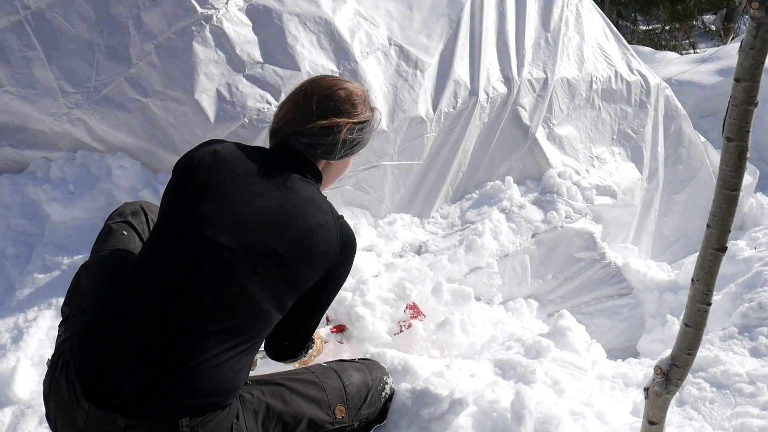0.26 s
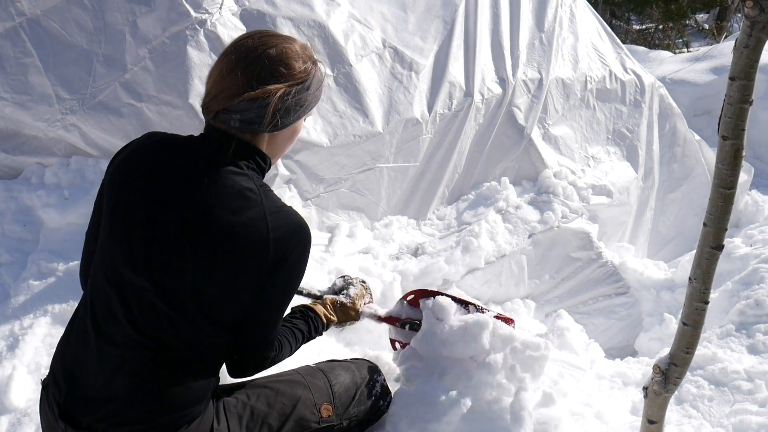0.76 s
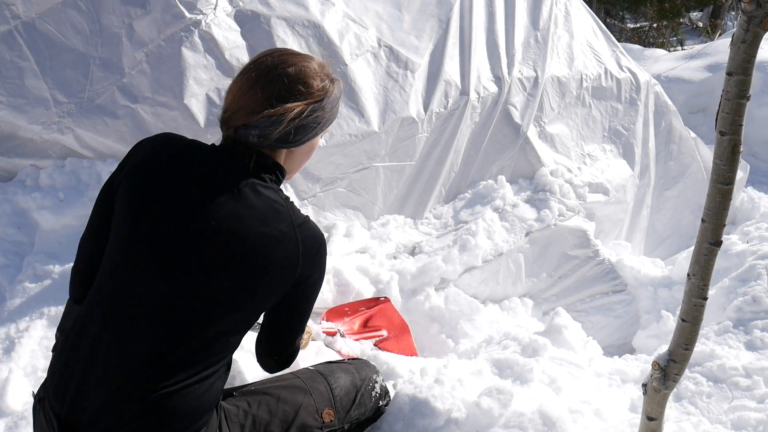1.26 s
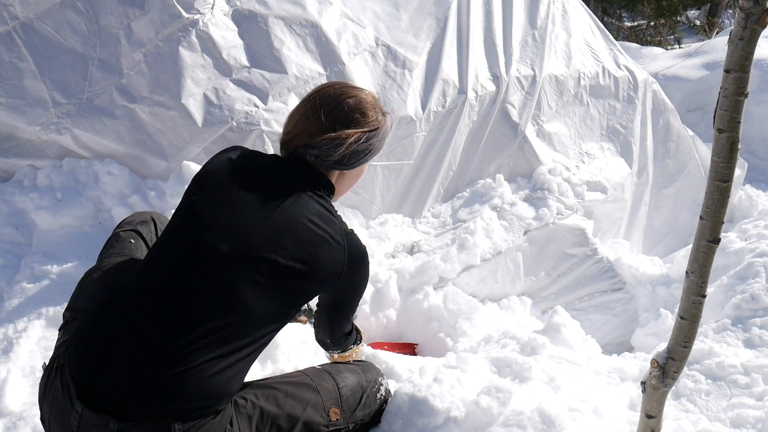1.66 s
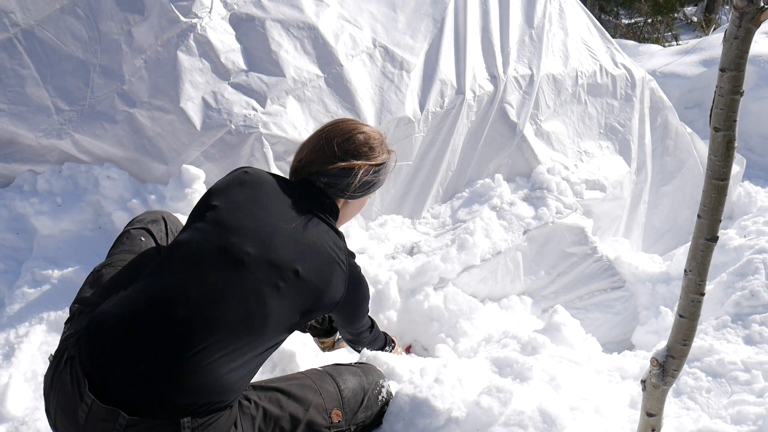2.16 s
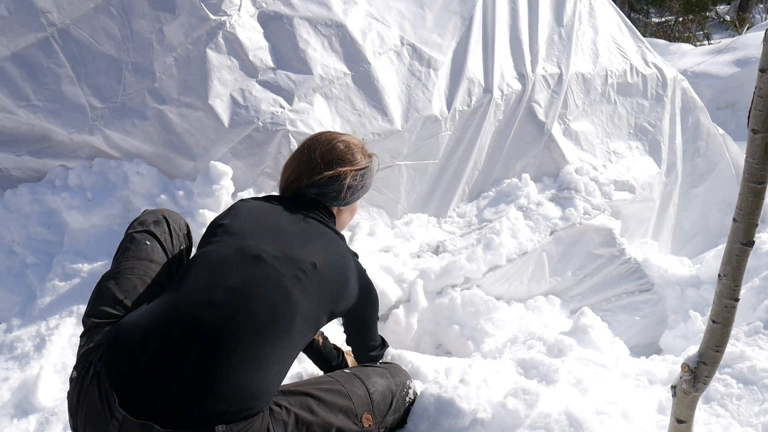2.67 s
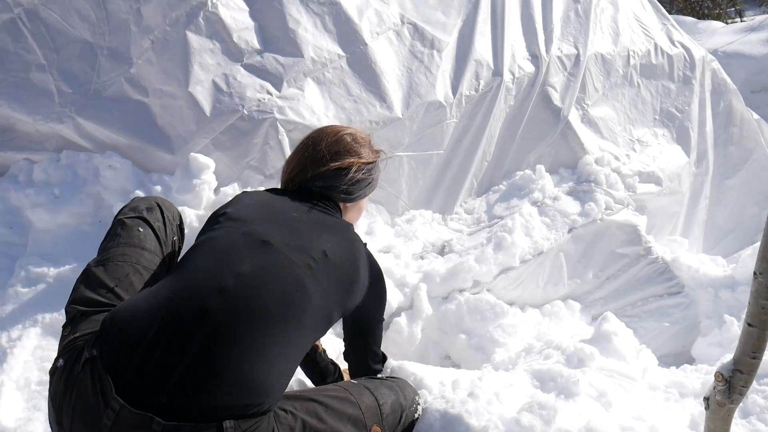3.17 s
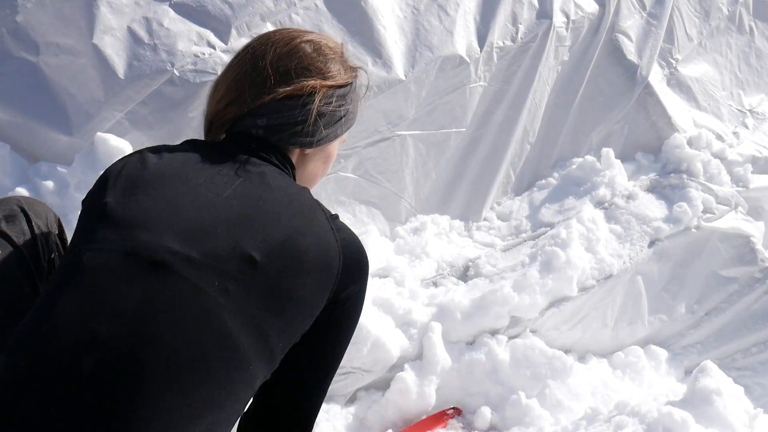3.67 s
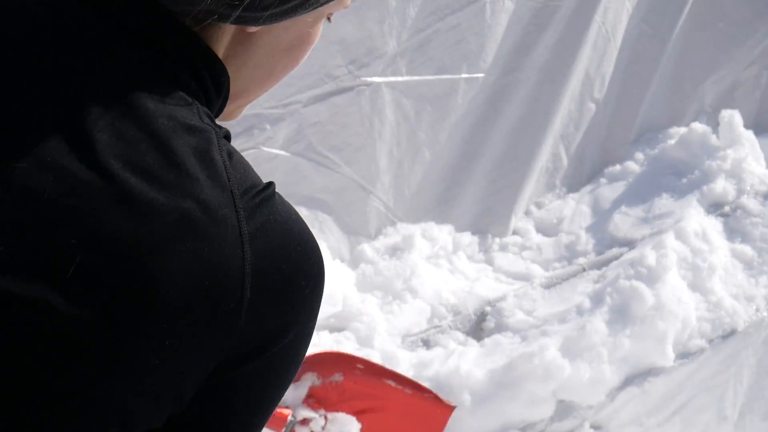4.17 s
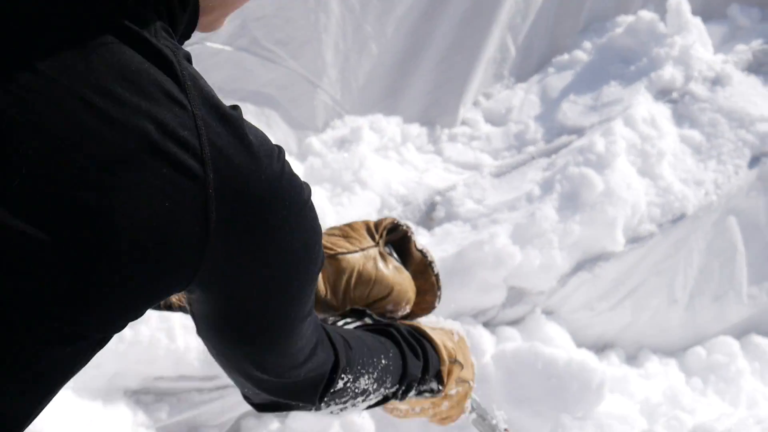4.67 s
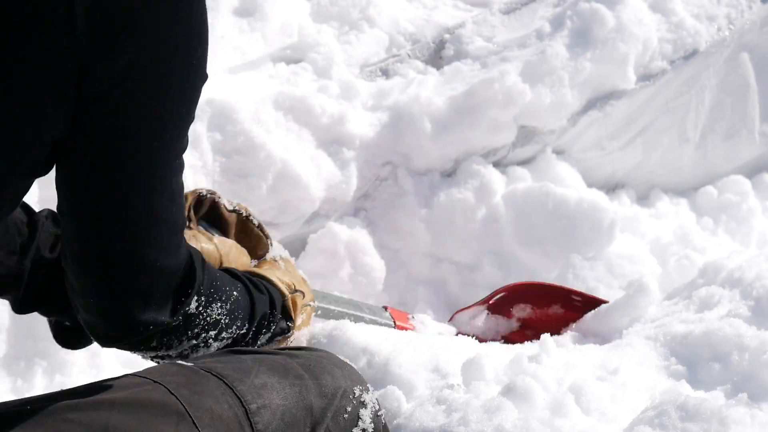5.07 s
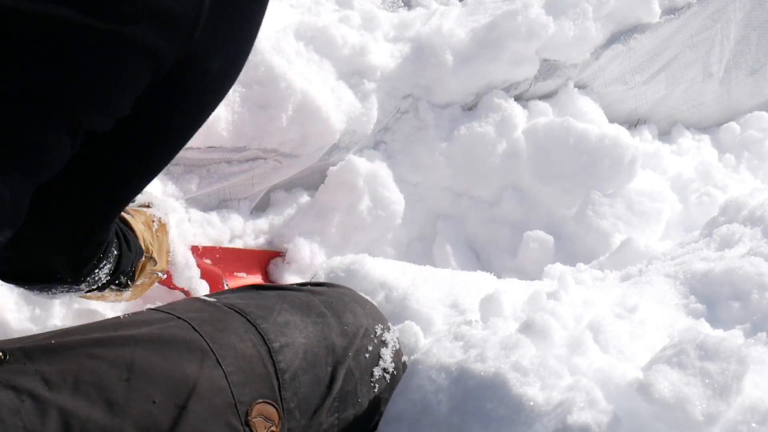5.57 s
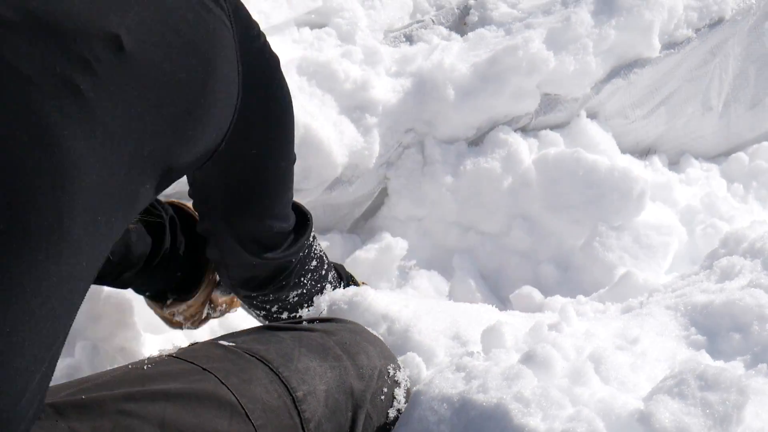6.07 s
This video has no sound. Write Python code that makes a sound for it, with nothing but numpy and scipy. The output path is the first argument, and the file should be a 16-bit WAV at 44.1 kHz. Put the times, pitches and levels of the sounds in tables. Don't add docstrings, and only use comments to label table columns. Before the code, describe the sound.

Close, dry snow digging: gritty crunches, powdery hiss, blade knocks and low thuds in uneven strokes, over faint wind in trees.

```python
import sys
import numpy as np
from scipy import signal
from scipy.fft import rfft, irfft
from scipy.io import wavfile
from scipy.ndimage import uniform_filter1d

SR = 44100
rng = np.random.default_rng(int(sys.argv[2]) if len(sys.argv) > 2 else 0)


def materialize(psi):
    bounded = np.clip(np.atleast_2d(psi).T, -1, 1)
    quanta = np.round(bounded * 32767).astype(np.int16)
    wavfile.write(sys.argv[1], SR, quanta)


def rack_gain(trim_db):
    fader = np.asarray(trim_db, float)
    return 10 ** (fader / 20)


N = 279153
OPPOSED = np.array([[1], [-1]])


def unit(x):
    return x / np.sqrt(np.mean(x ** 2))


def colour(x, points, share=1):
    hz, db = np.transpose(points)
    log_hz = np.log(np.linspace(1, SR / 2, 2049))
    cepstrum = irfft(np.interp(log_hz, np.log(hz), share * db * np.log(10) / 20))
    cepstrum[1:2048] *= 2
    cepstrum[2049:] = 0
    return signal.fftconvolve(x, irfft(np.exp(rfft(cepstrum))))[:N]


def ring(x, hz, width):
    return signal.lfilter(*signal.iirpeak(hz, hz / width, fs=SR), x)


def low_pass(x, hz):
    return signal.sosfilt(signal.butter(2, hz, fs=SR, output="sos"), x)


def walk(rate):
    hold = int(SR / rate)
    steps = np.repeat(rng.standard_normal(N // hold + 1), hold)
    return unit(uniform_filter1d(steps, hold)[:N])


def grains(rate, scatter_db, fine_db):
    sign = (rng.random(N) < rate / SR) * rng.choice([-1, 1], N)
    breaks = sign * rack_gain(np.minimum(scatter_db * rng.exponential(1, N), 15))
    return unit(unit(breaks) + rack_gain(fine_db) * rng.standard_normal(N))


def spread(make, side_db):
    return make() + rack_gain(side_db) * make() * OPPOSED


def pushes(s, rise, hold, fall, first_db, last_db, rest_db):
    t = np.arange(0, N / SR + .001, .001)[:, None] - s
    db = first_db + (last_db - first_db) * np.clip(t / np.maximum(hold, 1e-3), 0, 1)
    db = db - 20 * np.maximum(-t, 0) / rise
    db = db - 20 * np.maximum(t - hold, 0) / fall
    power = np.sum(rack_gain(2 * db), axis=1) + rack_gain(2 * rest_db)
    return np.sqrt(np.interp(np.arange(N) / SR, t[:, 0] + s[0], power))


def swells(table, rest_db):
    s, rise, fall, db = np.transpose(table)
    return pushes(s, rise, 0 * s, fall, db, db, rest_db)


def strokes():
    # peak time in seconds, rise in seconds, fall in seconds,
    # crunch in dB, powder over crunch in dB.
    leans = [(0.0, .05, 0.27, -36, -3.5), (.268, 0.12, 0.195, -46.5, -2.5), (.375, 0.057, 0.268, -47, 5),
             (0.827, 0.0864, 0.344, -38.5, -0.5), (1.02, .03, 0.147, -58, 16.5),
             (1.518, 0.19, 0.054, -42.5, -1.5), (1.751, 0.097, 0.05, -31, -1), (1.92, 0.18, .04, -42, -3.5),
             (2.222, 0.17, 0.12, -35.5, -4.5), (2.363, 0.14, 0.18, -33, -5), (3.0, 0.165, 0.6, -44.5, -5.5),
             (3.136, 0.43, 0.047, -42, -6), (3.328, 0.51, 0.14, -43.5, -5),
             (3.574, 0.12, 0.067, -35.5, -0.5), (3.755, .02, 0.18, -50, 4), (3.954, 0.15, 0.17, -40, -4.5),
             (4.052, 0.12, 0.052, -33.5, -4.5), (4.374, 0.093, 0.022, -43, -2),
             (4.528, 0.17, 0.074, -61, -17), (4.575, .003, .06, -38, 9), (4.64, 0.029, 0.13, -29, 3.5),
             (5.137, 0.11, 0.084, -32, 7), (5.64, 0.13, 0.026, -46, 2.5), (6.222, 0.028, 0.28, -40, -3)]
    # start in seconds, length in seconds, first level in dB,
    # last level in dB, powder over crunch in dB.
    scrapes = [(1.225, 0.019, -63, -53, 10.5), (1.276, 0.012, -58, -49, 5), (1.43, 0.0079, -40, -40, 3.5),
               (1.587, 0.063, -67, -55.5, 3.5), (1.656, 0.1366, -42.5, -33, -1),
               (1.924, 0.096, -39, -47, -2), (2.12, 0.1, -27.5, -35, 2), (2.6, 0.13, -55, -50, -5.5),
               (3.42, 0.063, -46.5, -51, -7), (3.552, 0.1834, -41, -30, -5), (4.085, 0.097, -35, -50.5, -7),
               (4.18, 0.052, -44, -46.5, -10), (4.599, 0.059, -25, -33, 5), (4.756, 0.7, -46, -49.5, -2),
               (5.215, 0.17, -33, -32.5, 3.5), (5.66, 0.1816, -37.5, -34.5, 0.5),
               (5.836, 0.41, -35, -36.5, -3.5)]
    # peak time in seconds, rise in seconds, crunch in dB, powder over crunch in dB.
    jabs = [
        (0.11, 0.051, -40.5, 1),
        (0.536, 0.016, -48, 5),
        (.606, 0.0437, -52.5, 9),
        (0.999, 0.056, -41, 6),
        (2.576, 0.037, -47, -5.5),
        (4.609, 0.022, -15.5, -15),
        (5.491, 0.037, -43.5, 2),
        (5.955, 0.093, -34.5, -4.5),
    ]
    grip_s, let_go_s, jab_fall, rest_db = 0.019, 0.021, 0.95, -65
    rows = [(s, up, 0, down, db, db, powder) for s, up, down, db, powder in leans]
    rows += [(s, grip_s, hold, let_go_s, first, last, powder) for s, hold, first, last, powder in scrapes]
    rows += [(s, up, 0, jab_fall * up, db, db, powder) for s, up, db, powder in jabs]
    *shape, first, last, powder = np.transpose(rows)
    force = pushes(*shape, first, last, rest_db)
    thrown = pushes(*shape, first + powder, last + powder, rest_db + 3.5)
    return force, thrown / force


def patchy(x, depth_db, rate):
    out = 0
    for k, hz in enumerate(700 * 2 ** (np.arange(22) / 6)):
        fade = rack_gain(depth_db * min(3000 / hz, 1) * walk(rate))
        out = out + (-1) ** k * fade * ring(x, hz, hz / 7)
    return out


def crunch(hiss):
    # frequency in Hz, gain in dB.
    crystal_colour = [(500, -37.5), (900, -0.5), (1280, 7.5), (2000, 3), (3500, 2.5), (5000, -10.5),
                      (7000, -13.5), (16000, -68)]
    powder_colour = [(1500, -21.5), (3000, -3), (4500, -0.5), (6500, 3), (8500, 0.5), (10500, 0),
                     (12500, -9), (15500, -15.5)]
    crystals = patchy(grains(1500, scatter_db=1.0, fine_db=0.5), depth_db=2.0, rate=30)
    powder = grains(2500, scatter_db=2.0, fine_db=2.5)
    return unit(colour(crystals, crystal_colour)) + hiss * unit(colour(powder, powder_colour))


def blade():
    # frequency in Hz, bandwidth in Hz, level in dB.
    loaded_modes = [(1050, 122, -4.5), (1348, 67, 0), (1500, 42, 3.5), (1642, 67, 2), (2090, 88, -1.5),
                    (2360, 59, -1), (2540, 110, -1), (2854, 72, -0.5), (3280, 170, -7.5), (3870, 43, -3),
                    (4256, 59, -1.5), (4638, 16, -1), (5010, 290, -10), (5900, 170, -8.5)]
    rub = grains(600, scatter_db=-1.0, fine_db=3.5)
    out = 0
    for k, (hz, width, db) in enumerate(loaded_modes):
        out = out + (-1) ** k * rack_gain(db + 1.7 * walk(20)) * ring(rub, hz, width)
    return unit(out)


def clumps(rate, scatter_db, sharp):
    pitches = 1250 * 2 ** (np.arange(8) / 3.5)
    return unit(sum(ring(grains(rate, scatter_db, fine_db=-30), hz, hz / sharp) for hz in pitches))


def digging():
    force, hiss = strokes()
    slip_db = 0.79 * walk(60) + 1.24 * walk(200)
    crumbs = rack_gain(-8) * hiss ** 0.49 * clumps(25, scatter_db=-3.0, sharp=19.0)
    snow = spread(lambda: crunch(hiss), side_db=-11.5)
    metal = rack_gain(-1) * spread(blade, side_db=-12.5)
    return force * rack_gain(-3.5 + slip_db) * (snow + metal + crumbs)


def bank(x):
    lag_ms, echo_db = 0.7913, -12.5
    late = np.arange(N) - lag_ms * SR / 1000 * (1 + 0.15 * walk(7))
    return x + rack_gain(echo_db) * np.array([np.interp(late, np.arange(N), c) for c in x])


def weight():
    # peak time in seconds, rise in seconds, fall in seconds, level in dB.
    shifts = [(0.0, .1, 0.54, -51.5), (.53, 0.128, 0.18, -56), (1.27, 0.078, 0.044, -56),
              (1.74, 0.28, 0.38, -58.5), (2.4, 0.24, 0.15, -44), (2.96, 0.82, 1.42, -56.5),
              (3.72, 1.2, 0.13, -65), (4.04, 0.31, 0.195, -57), (4.6, .13, 0.88, -69),
              (5.15, .3, 1.3, -64.5), (5.52, 0.11, 0.04, -53), (5.77, 0.135, 0.215, -51.5),
              (5.94, 0.19, 0.86, -47.5)]
    groan = spread(lambda: unit(ring(ring(rng.standard_normal(N), 124.7, 81), 105, 114)), side_db=-7)
    return swells(shifts, rest_db=-68) * groan


def wind():
    # time in seconds, level in dB.
    gusts = [(0.0, -48), (0.69, -45.5), (0.83, -47), (1.09, -46), (1.5, -38.5), (1.8, -35), (2.27, -43),
             (2.47, -42.5), (2.86, -37), (3.06, -40.5), (3.4, -45), (3.75, -41), (4.21, -47.5),
             (4.44, -47.5), (4.74, -44.5), (5.39, -46.5), (5.68, -49), (6.33, -43.5)]
    # frequency in Hz, gain in dB.
    tree_colour = [(40, -36), (300, -10.5), (550, -5.5), (770, 3.5), (900, -4), (1040, -11), (1600, -21),
                   (15000, -49)]
    s, db = np.transpose(gusts)
    gust_db = np.interp(np.arange(N) / SR, s, db)
    sigh = spread(lambda: unit(colour(rng.standard_normal(N), tree_colour)), side_db=-7.5)
    return rack_gain(gust_db - 1.5 + 0.4 * walk(2.02)) * sigh


def thuds():
    # start in seconds, peak in dB, frequency in Hz.
    clods = [(.007, -26, 185), (0.025, -18, 235), (.077, -16.5, 407), (.109, -22, 340.7),
             (.269, -30.5, 173), (.429, -32, 211), (.528, -33, 244), (1.747, -23, 360), (1.916, -23, 333),
             (2.145, -25.5, 269.5), (2.309, -20, 325), (2.388, -26.5, 127), (2.969, -32.5, 265),
             (3.461, -28, 382), (3.7001, -16.5, 357), (3.728, -24, 352), (3.724, -22, 197.6),
             (4.344, -33, 370), (4.596, -27, 384), (5.145, -16, 408), (5.212, -21.5, 348),
             (5.317, -22, 458), (5.481, -29, 106), (5.755, -25, 330), (5.772, -23, 350), (5.911, -25, 268),
             (5.924, -22.5, 332), (6.025, -25, 185.4), (6.139, -22, 269), (6.168, -18, 210),
             (6.283, -24, 327.6)]
    t60_s, push_s = 0.064, 0.0017
    out, t = np.zeros(N + 8192), np.arange(8192) / SR
    for s, db, hz in clods:
        wobble = np.sin(2 * np.pi * hz * t) * rack_gain(-60 * t / t60_s) * (1 - np.exp(-t / push_s))
        out[int(s * SR):][:len(t)] += rack_gain(db - 10.0) * wobble / wobble.max()
    return signal.sosfilt(signal.butter(2, 80, "highpass", fs=SR, output="sos"), out[:N])


def packing():
    # peak time in seconds, rise in seconds, fall in seconds, level in
    # dB.
    squeezes = [(.08, 1.08, 0.23, -38), (.39, 0.13, 0.19, -46), (.53, 0.015, 0.049, -39.5),
                (.9, 0.54, 0.22, -50.5), (1.76, 0.06, 0.064, -31), (1.94, 0.11, 0.1, -39.5),
                (2.15, 0.064, 0.103, -34.5), (2.34, 0.45, 0.27, -36.5), (2.73, 0.486, 0.053, -41.5),
                (3.0, 0.26, 0.17, -38), (3.17, 0.19, 0.05, -37), (3.24, 0.044, 0.92, -43),
                (3.67, 1, 0.055, -44), (3.72, 0.096, 0.034, -34), (3.95, 0.088, 0.62, -41.5),
                (4.6, 0.0353, 0.66, -35), (5.17, 0.45, 0.019, -38.5), (5.34, 0.72, 0.11, -44),
                (5.5, 0.044, 0.019, -40), (5.77, 0.18, 0.23, -36), (5.9, 0.023, 0.97, -40),
                (6.17, 0.36, 0.26, -37.5)]
    # frequency in Hz, gain in dB.
    pack_colour = [(30, -54), (70, -55.5), (130, -7), (200, -0.5), (350, 3), (480, -2), (700, -13.5),
                   (2000, -45.5)]
    steps = spread(lambda: unit(colour(grains(150, scatter_db=5.0, fine_db=0.0), pack_colour)), side_db=-13.0)
    return swells(squeezes, rest_db=-55) * rack_gain(-1.5 + 0.76 * walk(25)) * steps


def snaps():
    # start in seconds, peak in dB, centre in Hz, bandwidth as a ratio to the centre.
    crystal_snaps = [(.106, -19, 2000, 1.2), (.9935, -24, 3500, 1.2), (.998, -22, 2500, 1.2),
                     (1.157, -36, 6000, 1.2), (1.176, -33, 9000, 1), (1.217, -42, 8000, 1.3),
                     (1.435, -20.5, 2500, 1), (1.653, -18, 4000, 1.5), (1.7318, -20, 2500, .15),
                     (1.7443, -17, 1430, .3), (1.7465, -20, 4200, .6), (1.7585, -17, 1500, 0.7),
                     (1.765, -23, 2300, .3), (1.792, -22, 2000, 1.3), (2.066, -38, 1000, .4),
                     (2.1317, -6, 3500, 1.1), (2.155, -19, 2800, .08), (2.177, -24, 4100, .05),
                     (2.1845, -11, 2670, 0.17), (2.188, -10.5, 1300, 0.17), (2.195, -18, 2700, .12),
                     (2.542, -36, 1300, .5), (2.853, -40, 1200, .6), (3.575, -18, 2600, .4),
                     (3.694, -21, 1400, .6), (3.6988, -14.5, 1600, 1.8), (3.706, -19, 5500, 1),
                     (3.7236, -8.5, 3600, 1.6), (3.7281, -10, 2200, 2.3), (3.738, -21, 3100, .3),
                     (4.0635, -11, 1500, 0.65), (4.0645, -23, 4800, 0.65), (4.075, -26, 3000, .1),
                     (4.281, -49, 5350, 0.07), (4.33, -37, 3900, .05), (4.367, -37, 2530, .08),
                     (4.372, -34, 5200, .08), (4.426, -36, 5000, 1.4), (4.521, -35, 1800, 1),
                     (4.573, -27, 6000, 1.5), (4.597, -14, 1400, 0.23), (4.601, -12, 4350, .2),
                     (4.605, -9, 2430, .15), (4.695, -21, 1000, 1)]
    late_snaps = [(5.105, -25, 4120, .04), (5.117, -22, 4860, .06), (5.2267, -21.5, 1370, .08),
                  (5.2473, -20.5, 2500, .035), (5.267, -24, 2590, 0.03), (5.33, -21.5, 1620, .05),
                  (5.334, -19, 3300, 0.057), (5.357, -21, 4950, .02), (5.364, -19, 4900, 0.027),
                  (5.36, -24, 1140, .07), (5.368, -15.5, 4100, 0.036), (5.368, -20, 2400, .04),
                  (5.376, -23, 1150, .06), (5.385, -25.5, 2440, 0.011), (5.597, -33, 960, 0.51),
                  (5.617, -35, 2530, 0.036), (5.65, -27, 1080, 0.059), (5.697, -25, 2880, 0.022),
                  (5.75, -25, 2300, 0.9), (5.762, -24, 2300, .05), (5.803, -19, 1400, 0.52),
                  (5.8175, -18, 3470, 0.083), (5.825, -18, 2400, 1), (5.836, -22, 2450, .06),
                  (5.88, -28, 2390, .06), (5.951, -18, 3580, .15), (5.954, -23, 1300, .2),
                  (6.0075, -19, 2200, .3), (6.0295, -14.5, 1600, 1.4), (6.04, -24, 1450, .08),
                  (6.089, -21, 1480, .2), (6.1298, -16.5, 1290, 0.25), (6.16, -25, 1200, .4),
                  (6.19, -26, 1200, .4), (6.286, -25, 3500, .5)]
    break_s = .0007
    out, t = np.zeros((2, N + 4096)), np.arange(4096) / SR
    for s, db, hz, share in crystal_snaps + late_snaps:
        burst = rng.standard_normal((2, len(t))) * np.exp(-t / break_s)
        burst = burst[0] + rack_gain(-19.5) * burst[1] * OPPOSED
        click = ring(burst, hz, np.clip(share, .012, 1.9) * hz)
        click = low_pass(click, min(1.63 * hz, 11000))
        out[:, int(s * SR):][:, :len(t)] += rack_gain(db - 2.5) * click / np.abs(click).max()
    return out[:, :N]


def cracks():
    # start in seconds, peak in dB, ring in Hz,
    # decay by 60 dB in seconds.
    knocks = [(0.1065, -24, 2700, 0.038), (0.437, -25, 4040, 0.078), (1.731, -25, 2420, 0.038),
              (1.756, -18.5, 2370, 0.075), (2.1298, -14, 4030, 0.15), (2.1822, -9.5, 1590, 0.094),
              (2.2067, -9.5, 2580, 0.041), (2.255, -21, 1500, 0.043), (2.5719, -25, 1110, 0.029),
              (2.712, -32, 1550, 0.039), (2.82, -31, 2640, 0.0245), (2.8633, -29.5, 2680, 0.067),
              (2.9987, -35, 2750, 0.046), (3.6994, -16, 1490, 0.075), (3.7234, -18, 3267, 0.067),
              (3.809, -29, 1300, 0.057), (4.0634, -7, 2490, 0.056), (4.1858, -30, 1925, 0.033),
              (4.2275, -24.5, 1870, 0.03), (4.198, -25, 1890, 0.029), (4.581, -11.5, 1570, 0.038),
              (4.601, -7.5, 1520, 0.042), (4.6069, -4.5, 1860, 0.03), (5.358, -26, 4900, .045),
              (5.374, -28, 1124, 0.039), (5.7485, -18.5, 2260, 0.066), (5.8162, -16.5, 2410, 0.054),
              (5.947, -18, 2450, 0.047), (6.0294, -19, 1460, .051), (6.1295, -24, 1293, .049)]
    # start in seconds, peak in dB, ring in Hz, treble over ring in dB.
    lumps = [(0.2263, -29, 1750, -6), (0.5273, -31, 2500, -5), (0.7563, -31.5, 2330, -4),
             (0.7774, -26, 2427, 0), (0.993, -39, 1520, 5.44), (1.2268, -31.5, 3500, -2.47),
             (1.28, -33, 2860, 6), (1.424, -27.5, 1520, -14.5), (1.6539, -20, 2540, -2),
             (1.696, -21, 2700, 3), (1.8939, -25.5, 1570, -5.5), (1.9279, -19.5, 2520, -2),
             (2.092, -29, 1500, 3), (2.544, -43, 1280, -8), (3.518, -27.5, 1350, -9),
             (3.8687, -28.5, 2660, 2), (3.928, -25, 2930, -1), (4.0253, -23.5, 1610, 2),
             (4.2799, -30, 4430, -1), (4.3263, -31, 3870, -2), (4.364, -24.5, 2540, -3),
             (4.405, -35.5, 1100, 4), (4.6338, -10, 2800, -17.5), (5.2146, -26, 2470, -7),
             (5.3232, -20, 3320, 5), (5.4807, -32, 1150, -11.5), (5.5969, -35, 2540, 9),
             (5.649, -23.5, 1086, -10.5), (5.689, -20.5, 3060, 7)]
    knock_treble_db, lump_t60_s = -44, 0.1
    events = [(s, db, hz, knock_treble_db, t60) for s, db, hz, t60 in knocks]
    events += [(*lump, lump_t60_s) for lump in lumps]
    out, t = np.zeros((2, N + 4096)), np.arange(4096) / SR
    for s, db, hz, treble_db, t60 in events:
        decay = rack_gain(-60 * t / t60) + 1.44 * np.exp(-t / 0.0017)
        spray = rng.standard_normal((2, len(t))) * decay * np.minimum(t / 0.00037, 1)
        spray = spray[0] + rack_gain(-14.5) * spray[1] * OPPOSED
        tone = ring(spray, hz, 0.037 * hz) + 0.26 * ring(spray, 2000, 1950)
        treble = ring(ring(spray, 10500, 11000), 3600, 11000)
        both = tone / np.abs(tone).max() + rack_gain(treble_db) * treble / np.abs(treble).max()
        out[:, int(s * SR):][:, :len(t)] += rack_gain(db - 3.26) * low_pass(both, 9000)
    return out[:, :N]


def skids():
    # peak time in seconds, rise in seconds, fall in seconds, level in dB.
    crust_rubs = [
        (5.25, 0.14, 0.121, -35),
        (5.335, 0.026, 0.061, -29.5),
        (5.378, 0.056, 0.027, -30),
    ]
    # frequency in Hz, level in dB.
    bare_modes = [(1152, -3), (1647, -2), (2046, -3), (2490, 4.5), (3260, -2), (3488, -5.5), (4054, -2),
                  (4900, -5)]
    rub = swells(crust_rubs, rest_db=-99) * grains(900, scatter_db=4.5, fine_db=-3.0)
    return sum(rack_gain(db + 18.0) * ring(rub, hz, hz / 42) for hz, db in bare_modes)


def scene():
    lean_db = 1.54
    work = bank(digging() + cracks()) + skids() + snaps()
    rest = packing() + thuds() + weight() + wind()
    return work * rack_gain([[lean_db / 2], [-lean_db / 2]]) + rest


def top_cut(x):
    return signal.sosfilt(signal.butter(12, 15710, fs=SR, output="sos"), x)


def record(dry):
    # frequency in Hz, difference in dB.
    port_colour = [(60, 4.5), (110, -7.5), (380, -4.5), (700, -5), (1290, 1), (2380, -0.5), (8120, -4),
                   (15000, 4)]
    notch_hz, notch_width_hz, top_hz = 7870, 240, 15150
    ports = np.array([colour(dry[0], port_colour, 0.18), colour(dry[1], port_colour, -0.43)])
    edges = [notch_hz - notch_width_hz / 2, notch_hz + notch_width_hz / 2]
    notch = signal.butter(1, edges, "bandstop", fs=SR, output="sos")
    top = signal.ellip(12, .2, 50, top_hz, fs=SR, output="sos")
    mix = signal.sosfilt(np.vstack([notch, top]), ports)
    return top_cut(mix)


dry = scene()
out = record(dry)
materialize(out)
```